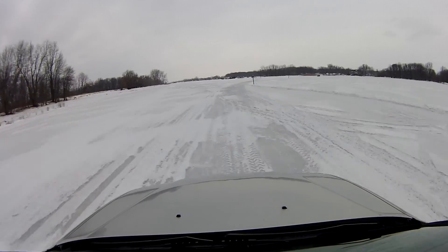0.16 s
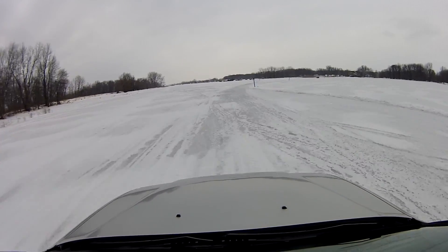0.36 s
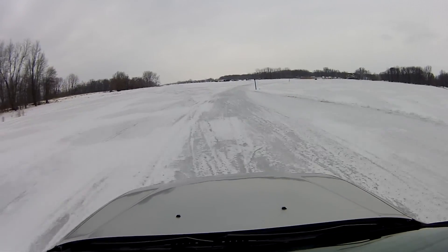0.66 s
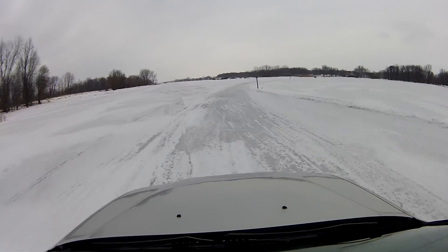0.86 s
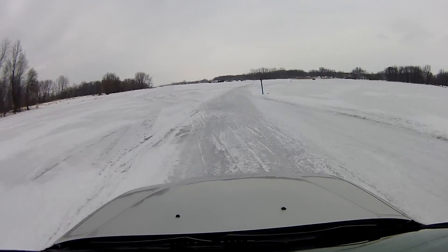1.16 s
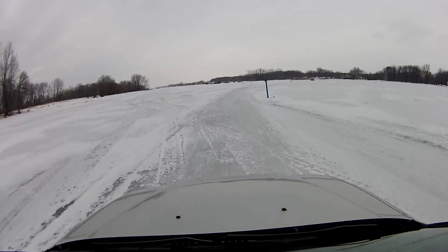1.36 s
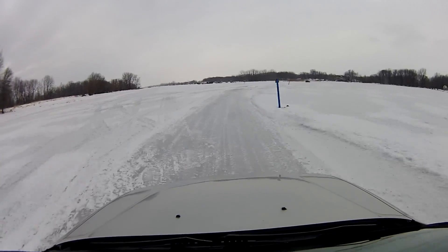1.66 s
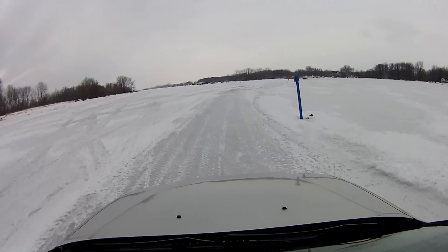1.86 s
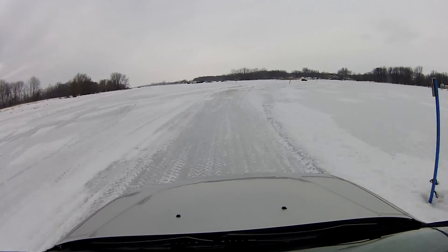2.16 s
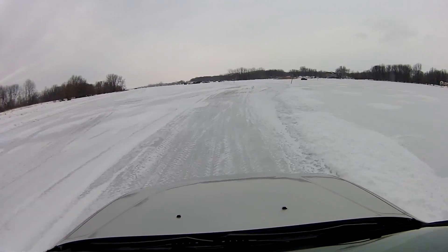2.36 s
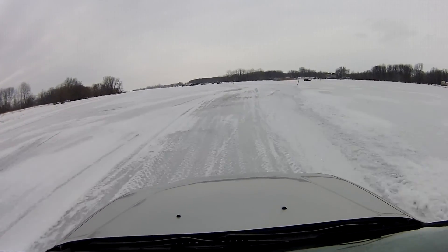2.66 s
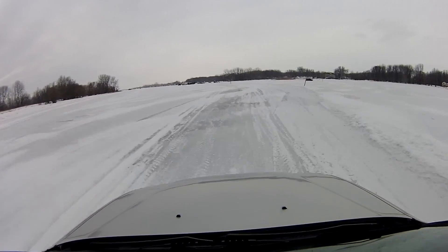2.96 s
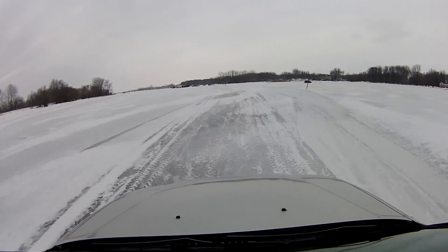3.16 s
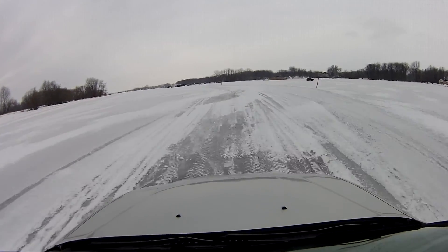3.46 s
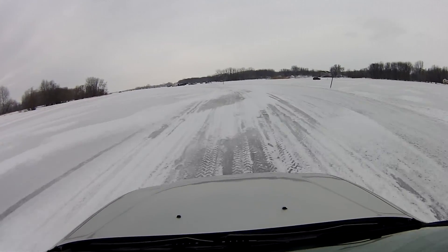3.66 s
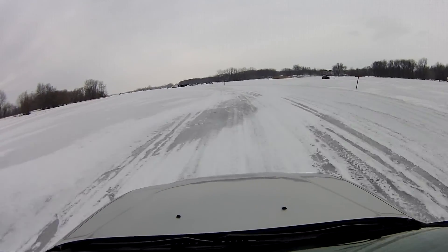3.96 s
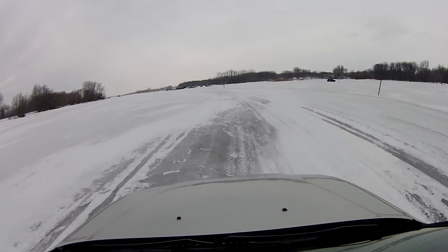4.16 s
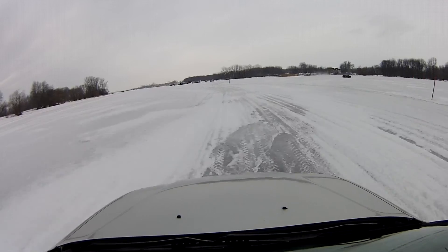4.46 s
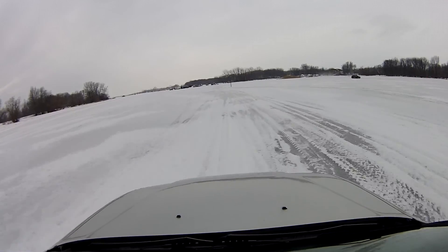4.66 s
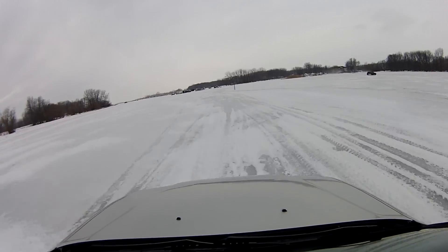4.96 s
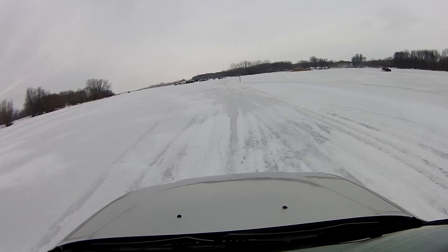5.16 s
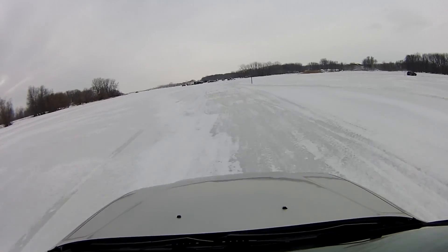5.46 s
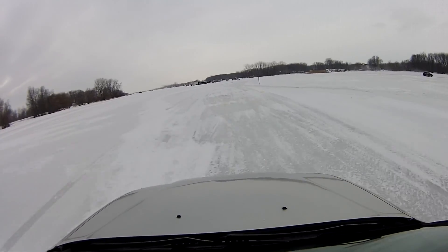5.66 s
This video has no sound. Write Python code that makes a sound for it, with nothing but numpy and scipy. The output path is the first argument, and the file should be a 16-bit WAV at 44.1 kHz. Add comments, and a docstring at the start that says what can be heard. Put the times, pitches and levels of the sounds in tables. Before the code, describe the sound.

Dense clusters of low thumps and plasticky knocks jolt a car-mounted camera while tyres crunch and hiss over packed snow.

```python
"""A camera mount on a car knocks and rocks as the car drives over ruts in packed snow and ice.
Each hit is a decaying swing (thump), struck stop resonances (knock) and housing resonances (crack).
Between jolts small bumps shudder the mount: short rocking bursts, scuffs and a shaped-noise drone.
Tyre rush, road rumble and snow hiss are shaped noise; crunch, grit and ice ticks are random grains.
A faint steady sine is the whine of the camera's electronics."""
import sys
import numpy as np
from scipy import signal
from scipy.fft import rfft, irfft
from scipy.io import wavfile

SR = 44100
rng = np.random.default_rng(int(sys.argv[2]) if len(sys.argv) > 2 else 0)


def generate_wav(signal):
    """Clip the signal to [-1, 1] and save it as 16-bit WAV at the path in sys.argv[1]."""
    frames = np.transpose(np.atleast_2d(signal))
    scaled = np.clip(frames, -1, 1) * 32767
    pcm = np.round(scaled).astype(np.int16)
    wavfile.write(sys.argv[1], SR, pcm)


N = 256220

# Tyre rush and snow hiss, with a swell through looser snow near the end; each is trimmed under 1 dB later.
# Each row: time in seconds, rush level in dB, hiss level in dB.
DRIVE_S_DB = [(0.0, -42, -60), (0.6, -42.5, -62), (1.3, -40.5, -61.5), (2.2, -41, -59.5), (3.0, -43, -59.5),
              (3.6, -41, -58.5), (4.65, -41.5, -59), (5.1, -39.5, -55.5), (5.45, -40.5, -58),
              (5.8, -41, -58)]
# Shaking of the mount on rough snow. Each row: time in seconds, level in dB.
SHUDDER_S_DB = [(0.0, -45.5), (0.3, -42), (0.52, -37), (0.78, -39.5), (0.96, -35), (1.35, -35), (1.7, -35),
                (2.05, -41), (2.5, -35), (2.78, -36.5), (2.88, -44.5), (3.06, -34.5), (3.3, -38.5),
                (4.1, -41), (4.3, -51), (4.65, -34), (5.25, -36), (5.55, -43)]
# Larger bits of ice hitting the body. Each row: start in seconds, level in dB before a common trim.
ICE_TICKS_S_DB = [(0.2099, -37), (0.3594, -34.5), (1.1916, -32), (2.0298, -36), (2.3984, -41),
                  (2.6778, -36), (4.3306, -36), (5.4465, -35.5)]
# Jolts of the mount, and the harder rebounds that follow some within 15 ms.
# Each row: start in seconds, thump level in dB, knock level in dB, crack level in dB.
JOLTS_S_DB = [(0.499, -16.5, -27, -35), (0.520, -15.5, -31, -42), (0.544, -17, -32, -51),
              (0.659, -13, -21.5, -25.5), (0.708, -16, -23.5, -32), (0.7426, -12.5, -16.5, -16),
              (0.754, -13.5, -14, -22.5), (0.7747, -9.5, -20.5, -53), (0.853, -9, -21, -35),
              (0.869, -15, -30, -47), (1.045, -16.5, -31, -33), (1.111, -17, -16, -15.5),
              (1.121, -15.5, -20, -31), (1.152, -12, -16, -21), (1.161, -12, -18, -24),
              (1.183, -14.5, -24, -25), (1.197, -20, -22, -24.5), (1.209, -9.5, -16, -31),
              (1.241, -11.5, -20.5, -36), (1.2563, -19.5, -13, -18.5), (1.264, -11, -17, -18),
              (1.336, -17.5, -19.5, -24), (1.3607, -8.5, -15.5, -29), (1.373, -11.5, -38, -34),
              (1.438, -10, -15.5, -27.5), (1.445, -11.5, -19, -41), (1.4998, -6, -16, -27),
              (1.565, -18, -27, -33), (1.612, -17, -34, -32), (1.708, -13.5, -26, -30.5),
              (1.779, -11.5, -26, -35), (1.829, -15.5, -26.5, -36), (1.871, -17, -21, -29),
              (1.942, -10.5, -21, -22), (1.968, -14, -20, -24), (1.982, -13.5, -25, -37),
              (2.017, -13.5, -23.5, -35), (2.0423, -10.5, -12.5, -20), (2.080, -18, -21.5, -28.5),
              (2.109, -10, -17.5, -46), (2.157, -6, -15.5, -26), (2.179, -13, -25.5, -47),
              (2.292, -11, -25, -37), (2.833, -15, -30, -38), (2.854, -21, -24, -31),
              (2.902, -16, -26, -30), (3.089, -19, -31, -30.5), (3.177, -18, -30, -42),
              (3.194, -19.5, -26, -37), (3.509, -17.5, -28.5, -39), (3.537, -15.5, -29, -35),
              (3.838, -17, -40, -41), (3.875, -18.5, -25.5, -27), (3.970, -20.5, -29, -35),
              (4.017, -12.5, -25, -28), (4.061, -13, -27.5, -40), (4.084, -18, -29.5, -45),
              (4.199, -18.5, -32, -41), (4.502, -15, -34, -48), (4.566, -13.5, -28, -37),
              (4.616, -17.5, -27, -32), (4.655, -15.5, -24, -29), (4.716, -10.5, -21, -39),
              (4.796, -17.5, -36, -36), (4.834, -18.5, -26.5, -38), (4.885, -10.5, -24, -32),
              (4.947, -13, -15, -14.5), (5.027, -12, -21, -28), (5.300, -17, -24, -25.5),
              (5.340, -9, -11, -26.5), (5.486, -8, -21.5, -36), (5.599, -13.5, -25, -43)]

# Spectra of road rumble, snow hiss, tyres and mount drone.
# Each row: frequency in Hz, relative density in dB.
RUMBLE_HZ_DB = [(12, -34), (25, -8), (45, -5), (70, 0.5), (100, 7), (200, -20.5), (500, -64)]
SNOW_HZ_DB = [(3000, -45), (5500, -0.5), (7300, -4.5), (9000, -2), (10700, 2), (12000, -0.5), (13500, -6.5),
              (15300, -18)]
TYRES_HZ_DB = [(100, 3.5), (400, -1.5), (650, -4.5), (900, -2), (1140, 3), (1400, -3), (1750, -1),
               (2300, 2), (2830, 6.5), (3150, 0), (3650, -10.5), (5100, -16), (6100, -16), (7400, -34)]
SHAKE_HZ_DB = [(50, -28), (80, 8), (110, 7), (170, -6.5), (215, -3), (270, 2), (350, -3), (480, -16.5),
               (900, -46.5)]

# Resonances: mount in soft contact, mount in hard contact, housing, ice on the body.
# Each row: mean frequency in Hz, width in Hz, mean relative level in dB.
THUMP_MODES_HZ_DB = [(285, 161, 6)]
KNOCK_MODES_HZ_DB = [(445, 410, -9), (680, 420, -4.5), (900, 230, -39), (1103, 196, -7.5),
                     (1680, 1600, -13)]
HOUSING_MODES_HZ_DB = [(2160, 1500, -24), (2455, 500, 10.5), (2830, 140, 0), (4220, 580, -13),
                       (4260, 610, 0), (6100, 1100, -3)]
TICK_MODES_HZ_DB = [(2760, 370, -16), (4090, 120, 21), (5060, 260, 18), (5970, 720, -34),
                    (10000, 3500, -11)]

RUMBLE_DB, RUMBLE_SWELL_DB = -45, 2.5
WHINE_HZ, WHINE_DB = 10519.4, -73
CUTOFF_HZ = 15500
# small bumps: ranges of gap, rocking rate and swings; scatter of size
BUMP_GAP_S, BUMP_HZ, BUMP_SWINGS, BUMP_SPREAD_DB = (.02, .045), (150, 220), (1.5, 4.5), 2.0
HOLD_BEFORE_S, HOLD_AFTER_S = .012, .025   # no small bumps around a jolt
# spring softens under load: harder thumps rock slower
ROCK_HZ, ROCK_AT_DB, SOFTENING_HZ_PER_DB, ROCK_SCATTER_HZ = 157.8, -14, 2.5, 12
# sharp cracks jam the mount early; soft thumps leave it rocking
SWINGS, SWINGS_PER_SOFT_DB, SWINGS_SCATTER = 1.63, .03, .4
SHORT_SAMPLES = 3000   # length of one contact sound


def from_db(db):
    """Decibels to gain."""
    return 10 ** (np.asarray(db) / 20)


def rms_one(x):
    """Scale to rms 1."""
    return x / np.sqrt(np.mean(x ** 2) + 1e-20)


def per_ms(x):
    """Scale a short sound to the energy of one millisecond at rms 1."""
    return x / np.sqrt(np.sum(x ** 2) * 1000 / SR + 1e-20)


def in_time(rows):
    """Interpolate each column of a curve at every sample."""
    knots_s, *columns = np.transpose(rows)
    time_s = np.arange(N) / SR
    return [np.interp(time_s, knots_s, column) for column in columns]


def add(out, start_s, sound):
    """Mix a short sound in at its start time."""
    i = max(int(start_s * SR), 0)
    out[i:i + len(sound)] += sound[:max(N - i, 0)]


def cut(x, hz, kind, order=2):
    """Low- or high-pass."""
    sos = signal.butter(order, min(hz, SR / 2 - 1), kind, fs=SR, output="sos")
    return signal.sosfilt(sos, x)


def drift(rate_hz):
    """Random knots joined by straight lines; rms 1."""
    knots = rng.standard_normal(N)
    return rms_one(np.interp(np.arange(N) * rate_hz / SR, np.arange(N), knots))


def coloured(x, spectrum_hz_db):
    """Filter x by a spectrum interpolated over log frequency; rms 1."""
    hz, db = np.transpose(spectrum_hz_db)
    bins_hz = np.maximum(np.fft.rfftfreq(N, 1 / SR), 1)
    gain = from_db(np.interp(np.log(bins_hz), np.log(hz), db))
    return rms_one(irfft(rfft(x) * gain, N))


def resonate(x, modes_hz_db):
    """Parallel two-pole resonances, scattered a little in pitch and strength at each call."""
    out = 0
    for hz, width_hz, db in modes_hz_db:
        hz, db = hz * rng.normal(1, .025), db + rng.normal(0, 1.5)
        radius, angle = np.exp(-np.pi * width_hz / SR), 2 * np.pi * hz / SR
        poles = [1, -2 * radius * np.cos(angle), radius * radius]
        gain = from_db(db) * (1 - radius * radius) / 2
        out = out + gain * signal.lfilter([1, 0, -1], poles, x)
    return out


def road_rumble():
    """Low shaped noise wandering about a steady level."""
    level_db = RUMBLE_DB + RUMBLE_SWELL_DB * drift(3.01)
    return from_db(level_db) * coloured(rng.standard_normal(N), RUMBLE_HZ_DB)


def snow_hiss(hiss_db, trim_db=-0.55):
    """High shaped noise following the drive."""
    return from_db(hiss_db + trim_db) * coloured(rng.standard_normal(N), SNOW_HZ_DB)


def grains(per_s, spread_db):
    """Random clicks of uneven size and either sign."""
    sizes = from_db(spread_db * np.minimum(rng.exponential(1, N), 3))
    return (rng.random(N) < per_s / SR) * sizes * rng.choice([-1, 1], N)


def tyres(rush_db, shake_db, crunch_db=-7.5, grit_db=-22.0, trim_db=-0.22):
    """Shaped-noise rush, plus patchy grains of crunching snow and flung grit that grow on rough track."""
    rush = coloured(rng.standard_normal(N), TYRES_HZ_DB) * from_db(0.58 * drift(25))
    rough_db = .4 * (shake_db - np.mean(shake_db)) + 3.5 * np.tanh(drift(30))
    crunch = cut(coloured(grains(per_s=500, spread_db=3.5), TYRES_HZ_DB), 2240, "low")
    grit = resonate(grains(per_s=110, spread_db=3.0), TICK_MODES_HZ_DB)
    patches = from_db(crunch_db) * rms_one(crunch) + from_db(grit_db) * rms_one(grit)
    return from_db(rush_db + trim_db) * (rush + from_db(rough_db) * patches)


def grating(decay_s):
    """A brief rub: a fading run of uneven slips, energy 1."""
    slips = rng.laplace(0, 1, SHORT_SAMPLES) * (rng.random(SHORT_SAMPLES) < .08)
    slips = slips * np.exp(-np.arange(SHORT_SAMPLES) / (decay_s * SR))
    return slips / np.sqrt(np.sum(slips ** 2))


def rock(rate_hz, swings):
    """The mount swings on its spring until dry friction brings it to a dead stop."""
    turns = np.arange(SHORT_SAMPLES) * rate_hz / SR
    envelope = np.maximum(1 - (turns / max(swings + .5, 1)) ** 2, 0)
    return np.sin(2 * np.pi * turns) * envelope


def shudder(shake_db, rock_db=-1.0, bed_db=-5.5, scuff_db=-11):
    """Small bumps rock the mount in short bursts, each with a faint scuff; the car body drones beneath."""
    rocking, scuffs = np.zeros(N), np.zeros(N)
    jolts_s = np.array(JOLTS_S_DB)[:, 0]
    for start_s in np.cumsum(rng.uniform(*BUMP_GAP_S, 200)):
        rate_hz, swings = rng.uniform(*BUMP_HZ), rng.uniform(*BUMP_SWINGS)
        size_db = rng.normal(0, BUMP_SPREAD_DB)
        scuff = resonate(grating(decay_s=0.0066), THUMP_MODES_HZ_DB + KNOCK_MODES_HZ_DB)
        if np.any((start_s > jolts_s - HOLD_BEFORE_S) & (start_s < jolts_s + HOLD_AFTER_S)):
            continue   # a harder jolt has hold of the mount
        add(rocking, start_s, from_db(size_db) * rock(rate_hz, swings))
        add(scuffs, start_s, from_db(size_db) * scuff)
    rocking = from_db(rock_db) * rms_one(cut(rocking, 59, "high"))
    scuffs = from_db(scuff_db) * rms_one(cut(scuffs, 1900, "low"))
    bed = from_db(bed_db) * coloured(rng.standard_normal(N), SHAKE_HZ_DB)
    return from_db(shake_db) * (rocking + scuffs + bed)


def electronics_whine():
    """Faint steady sine of the camera's electronics."""
    return from_db(WHINE_DB) * np.sin(2 * np.pi * WHINE_HZ * np.arange(N) / SR)


def ice_ticks(decay_s=0.00058, trim_db=-4):
    """Each bit of ice shatters in a tiny burst that rings the panel."""
    out = np.zeros(N)
    for start_s, level_db in ICE_TICKS_S_DB:
        tick = resonate(grating(decay_s), TICK_MODES_HZ_DB)
        add(out, start_s, from_db(level_db + trim_db) * per_ms(tick))
    return out


def soft_onset():
    """A short, soft grating lead-in that blurs the attack of each hit."""
    onset = resonate(grating(decay_s=0.0011), KNOCK_MODES_HZ_DB + HOUSING_MODES_HZ_DB)
    return per_ms(cut(onset, 2300, "low"))


def bounces(rate_hz, keep):
    """A contact and two weaker rebounds, one per swing."""
    contacts = np.zeros(SHORT_SAMPLES)
    order = np.arange(3)
    contacts[(order * SR / rate_hz).astype(int)] = -keep ** order
    return contacts


def mount_thump(rate_hz, swings, push_db=-5.5):
    """Rocking of the mount plus the soft push of its contacts."""
    push = cut(resonate(bounces(rate_hz, keep=0.26), THUMP_MODES_HZ_DB), 630, "low")
    thump = per_ms(rock(rate_hz, swings)) + from_db(push_db) * per_ms(push)
    return per_ms(cut(thump, 49, "high", order=1))


def stop_knock(rate_hz, grate_db=-5.5):
    """Contacts and grating ring the mount against its stop."""
    contact = bounces(rate_hz, keep=0.056) + from_db(grate_db) * grating(decay_s=0.0098)
    return per_ms(cut(resonate(contact, KNOCK_MODES_HZ_DB), 1790, "low"))


def housing_crack(rate_hz, knock_db, crack_db, grate_db=-6, snap_db=-27, snap_per_db=15.0):
    """Hard contacts ring the housing; a high snap grows as the crack nears or passes the knock."""
    contact = bounces(rate_hz, keep=0.28) + from_db(grate_db) * grating(decay_s=0.0019)
    crack = cut(resonate(contact, HOUSING_MODES_HZ_DB), 3050, "low", order=3)
    snap = resonate(bounces(rate_hz, keep=.1), [(9600, 3200, 0)])
    hardness_db = snap_per_db * min(crack_db - max(knock_db, -19), 1)
    return per_ms(crack) + from_db(snap_db + hardness_db) * per_ms(snap)


def mount_jolts(onset_db=-7, onset_lead_s=.0018):
    """Each jolt or rebound sounds as a short grating lead-in, then thump, knock and crack together."""
    out = np.zeros(N)
    for start_s, thump_db, knock_db, crack_db in JOLTS_S_DB:
        rate_hz = ROCK_HZ - SOFTENING_HZ_PER_DB * (thump_db - ROCK_AT_DB)
        rate_hz += ROCK_SCATTER_HZ * rng.standard_normal()
        swings = SWINGS + SWINGS_PER_SOFT_DB * (thump_db - crack_db)
        swings += SWINGS_SCATTER * rng.standard_normal()
        add(out, start_s - onset_lead_s, from_db(crack_db + onset_db) * soft_onset())
        add(out, start_s, from_db(thump_db) * mount_thump(rate_hz, swings))
        add(out, start_s, from_db(knock_db) * stop_knock(rate_hz))
        add(out, start_s, from_db(crack_db) * housing_crack(rate_hz, knock_db, crack_db))
    return out


def scene():
    """Sum of all sources at one microphone."""
    rush_db, hiss_db = in_time(DRIVE_S_DB)
    shake_db, = in_time(SHUDDER_S_DB)
    rolling = road_rumble() + snow_hiss(hiss_db) + tyres(rush_db, shake_db) + shudder(shake_db)
    mix = rolling + electronics_whine() + ice_ticks() + mount_jolts()
    return mix[None]   # one channel


def record(dry):
    """Steep elliptic low-pass at the cutoff."""
    sos = signal.ellip(10, .1, 80, CUTOFF_HZ, fs=SR, output="sos")
    return signal.sosfilt(sos, dry)


dry = scene()
out = record(dry)
generate_wav(out)
```